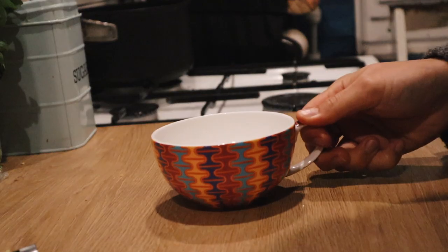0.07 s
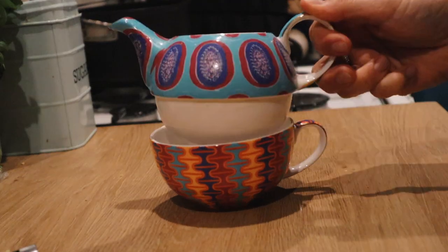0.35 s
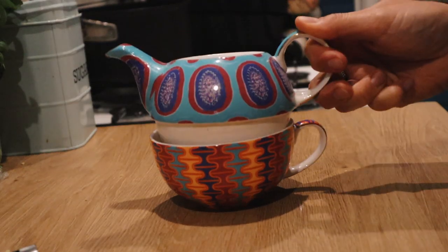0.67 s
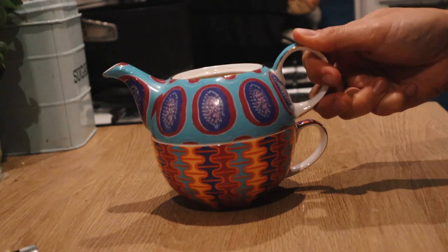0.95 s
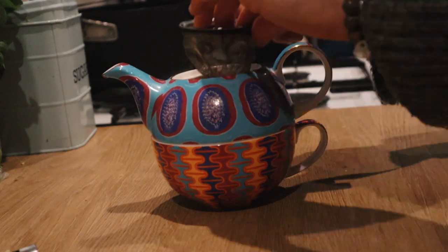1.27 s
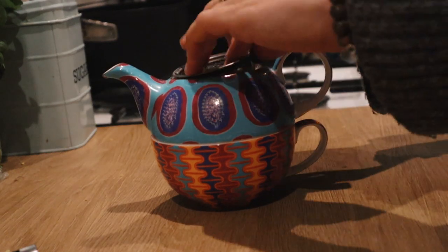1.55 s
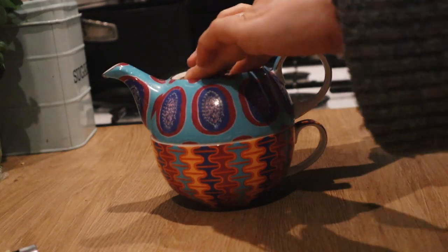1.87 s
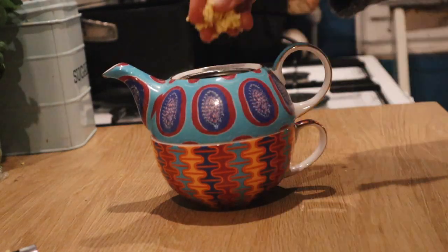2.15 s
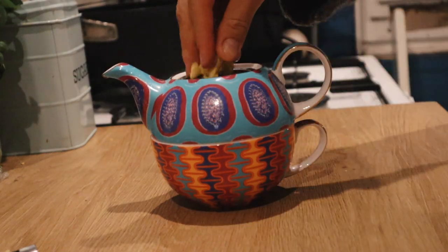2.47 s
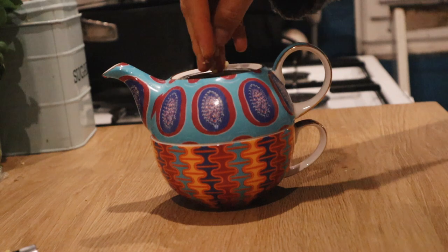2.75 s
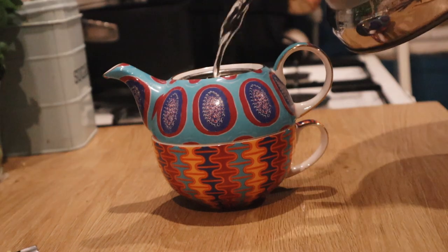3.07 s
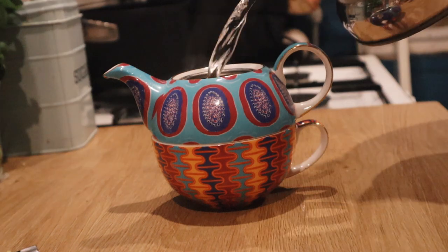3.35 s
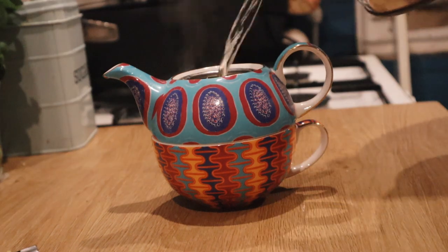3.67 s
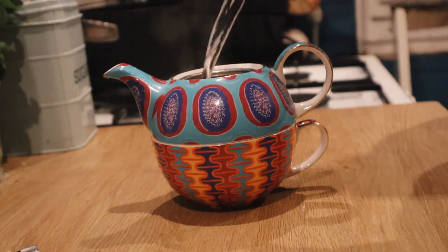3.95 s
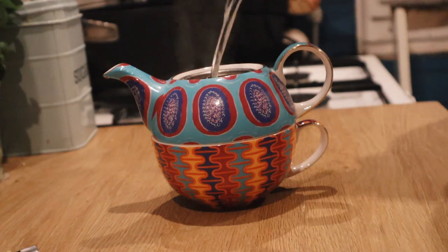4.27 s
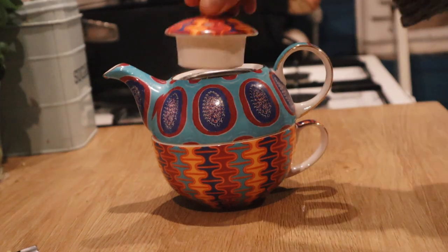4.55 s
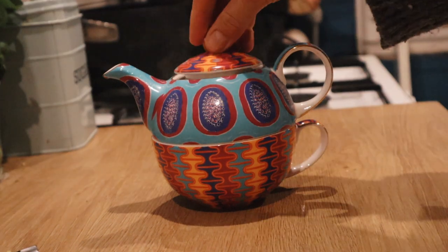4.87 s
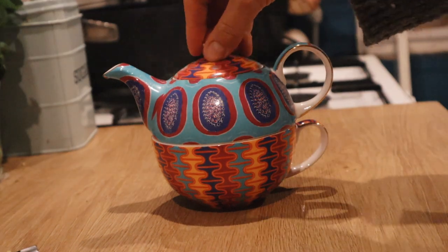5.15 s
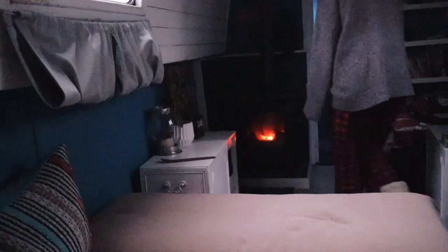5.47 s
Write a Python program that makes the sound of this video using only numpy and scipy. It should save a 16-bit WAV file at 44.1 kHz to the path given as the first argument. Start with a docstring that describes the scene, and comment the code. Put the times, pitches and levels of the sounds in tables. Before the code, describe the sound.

A china teapot rattles into a cup, a steel strainer drops in, water is poured and the lid clinks on, in a small kitchen.

```python
"""A china cup knocks down on a wooden worktop, then a teapot rattles into it: tea for one in a small kitchen.
A steel strainer drops in, a slice rubs in after it, hot water splashes through, the china lid is fitted.
Each hit is a burst of clatter plus ringing modes; the water is spray and bubbles in the pot's hollow.
A bird calls faintly outside; at the end come a soft footfall and a click over the room's hiss."""
import sys
import numpy as np
from scipy import signal
from scipy.fft import rfft, irfft, next_fast_len
from scipy.io import wavfile
from scipy.ndimage import map_coordinates

SR = 44100
rng = np.random.default_rng(int(sys.argv[2]) if len(sys.argv) > 2 else 0)


def wav_record(signal):
    """Record a signal, one row per channel, as 16-bit PCM in the file named by sys.argv[1]."""
    frames = np.transpose(np.atleast_2d(signal))
    bounded = np.clip(frames, -1, 1)
    # unit amplitude maps onto the largest positive 16-bit level
    quanta = np.round(bounded * 32767).astype(np.int16)
    wavfile.write(sys.argv[1], SR, quanta)


N = 251811


def amp(db):
    """Decibels to gain."""
    return 10 ** (np.asarray(db) / 20)


def unit(x):
    """x at rms 1."""
    return x / np.sqrt(np.mean(x ** 2) + 1e-20)


def curve_at(points, hz):
    """Read (f/Hz, value) points on a log frequency axis."""
    f, values = np.transpose(points)
    return np.interp(np.log(hz + 1), np.log(f + 1), values)


def envelope(rows):
    """Gain per sample from (t/s, level/dB) rows, silent outside them."""
    s, db = np.transpose(rows)
    return amp(np.interp(np.arange(N) / SR, s, db, left=-np.inf, right=-np.inf))


def wobble(rate):
    """A smooth random curve, rate knots a second."""
    return map_coordinates(rng.standard_normal(int(N * rate / SR) + 4), [np.arange(N) * rate / SR])


def add(track, s, sound):
    """Mix a sound into the track at time s."""
    start = max(round(s * SR), 0)
    track[start:start + len(sound)] += sound[:N - start]


def filtered(x, response):
    """x through a complex frequency response."""
    size = next_fast_len(N + SR // 2)
    return irfft(rfft(x, size) * response(np.fft.rfftfreq(size, 1 / SR)), size)[:N]


def coloured(x, eq):
    """x through an EQ curve, at rms 1."""
    return unit(filtered(x, lambda hz: amp(curve_at(eq, hz))))


def impulse_response(eq, size=4096):
    """Minimum-phase impulse response of an EQ curve."""
    gains = amp(curve_at(eq, np.fft.rfftfreq(size, 1 / SR)))
    cepstrum = irfft(np.log(gains + 1e-6))
    cepstrum[1:size // 2] *= 2
    cepstrum[size // 2 + 1:] = 0
    return irfft(np.exp(rfft(cepstrum)))[:size // 2]


def stroke(start, length, swell_db, db, release_t60, attack_s=.008):
    """Envelope of one push: a quick attack, a swell as the pressure grows, a release."""
    t = np.arange(N) / SR - start
    attack = np.clip(t / attack_s, 0, 1)
    below_peak_db = swell_db * np.clip(1 - t / length, 0, 1)
    release_db = 60 * np.maximum(t - length, 0) / release_t60
    return attack * amp(db - below_peak_db - release_db)


# Room tone EQ: f/Hz, relative level/dB
HISS_EQ = [(12, -34.5), (20, -3), (134, -4), (301, -10.5), (446, -10.5), (485, -13), (574, -11.5),
           (660, -12.5), (738, -13.5), (1090, -15.5), (2020, -18.5), (5230, -21.5), (16000, -25.5)]
def room_tone():
    """A bed of steady hiss."""
    return amp(-55.5) * coloured(rng.standard_normal(N), HISS_EQ)


# Reverb decay: f/Hz, t60/s
KITCHEN_DECAY = [(150, 0.19), (1000, 0.16), (5000, 0.18), (14000, .16)]
def kitchen_reverb(x):
    """The small room answers with a short noise tail after a 5 ms pre-delay."""
    hz, t, noise = signal.stft(rng.standard_normal(SR // 3), SR, nperseg=256)
    decay = amp(-60 * t / curve_at(KITCHEN_DECAY, hz)[:, None])
    tail = signal.istft(noise * decay, SR, nperseg=256)[1]
    return signal.fftconvolve(np.pad(x, (SR // 200, 0)), tail / np.linalg.norm(tail))[:N]


# Weight rolling onto the foot: t/s, length/s, swell/dB, final level/dB
FOOT_ROLL = [(5.16, 0.16, 9.5, -47.5)]
# Floorboard EQ: f/Hz, relative level/dB
BOARDS_EQ = [(12, -36), (20, -4.5), (119, -1.5), (189, -19), (323, -12.5), (366, -25), (400, -18),
             (520, -27), (880, -120)]
# The heel landing: t/s, f/Hz, level/dB, t60/s
HEEL_THUMP = (5.31, 42, -33, .14)
def footfall():
    """Floorboards thump and rumble under a step."""
    track, t = np.zeros(N), np.arange(SR // 4) / SR
    s, hz, db, t60 = HEEL_THUMP
    add(track, s, amp(db - 60 * t / t60) * np.sin(2 * np.pi * hz * t))
    rumble = stroke(*FOOT_ROLL[0], release_t60=1.75) * coloured(rng.standard_normal(N), BOARDS_EQ)
    return track + rumble


# Bird notes: t/s, length/s, start f/Hz, end f/Hz, dry level/dB
BIRD_NOTES = [(2.906, 0.077, 6420, 4000, -53.5), (3.097, 0.059, 6650, 3640, -50.5),
              (3.295, 0.23, 7340, 6850, -57)]
def bird():
    """Two falling slurs and a thin whistle, washed in reverb for distance."""
    track = np.zeros(N)
    for s, length, from_hz, to_hz, db in BIRD_NOTES:
        progress = np.linspace(0, 1, int(length * SR))
        phase = 2 * np.pi * np.cumsum(from_hz + (to_hz - from_hz) * progress) / SR
        add(track, s, amp(db) * np.sin(np.pi * progress) * np.sin(phase))
    return track + amp(-2.5) * kitchen_reverb(track)


def rub(strokes, eq, release_t60, db):
    """Sliding surfaces catch and slip many times a second; db trims the strokes' levels."""
    slips = rng.standard_normal(N) * amp(2 * wobble(160))
    return amp(db) * sum(stroke(*row, release_t60) for row in strokes) * coloured(slips, eq)


# Slides: t/s, length/s, swell/dB, final level/dB before trim; the strainer adds its scrape level/dB
STRAINER_SLIDES = [(1.353, .05, 3, -44.5, -70.5), (1.443, .155, 7, -38.5, -64.5),
                   (1.70, .04, 22, -28.5, -38.5), (1.838, 0.014, 21, -40.5, -39.5)]
SLICE_SLIDES = [(2.53, 0.13, 13, -47.5)]
LID_SLIDES = [(4.69, .04, 12, -38), (4.755, .026, 6, -30), (4.82, 0.14, 6, -50), (4.99, 0.072, 17, -40.5)]
# Friction EQs: f/Hz, relative level/dB
CHINA_RUB_EQ = [(59, -34), (100, -1), (211, -10), (434, -7.5), (523, -15.5), (617, -1), (895, -23),
                (1380, -32), (2620, -33), (6000, -47), (7370, -31), (8010, -47), (14000, -37.5)]
STEEL_SCRAPE_EQ = [(590, -28.5), (1000, -2.5), (3230, -20), (3540, -17), (7530, -20.5), (8960, -20),
                   (13000, -20.5), (16000, -19.5)]
LID_RUB_EQ = [(47, -43), (80, 7), (187, 0), (272, -0.5), (533, -11), (792, -5.5), (950, -4.5), (1200, -15),
              (1460, -22), (1930, -17), (3850, -33), (4880, -35), (6060, -44), (6690, -28), (9000, -55.5),
              (11700, -87), (19800, -120)]
def rubbing():
    """Strainer, slice and lid slide against the pot's mouth; the steel scrapes as it bites."""
    china = [(s, length, swell_db, db) for s, length, swell_db, db, _ in STRAINER_SLIDES]
    steel = [(s, length, swell_db, db) for s, length, swell_db, _, db in STRAINER_SLIDES]
    return (rub(china, CHINA_RUB_EQ, release_t60=.17, db=3.0)
            + rub(steel, STEEL_SCRAPE_EQ, release_t60=0.21, db=-1.5)
            + rub(SLICE_SLIDES, CHINA_RUB_EQ, release_t60=0.32, db=2.5)
            + rub(LID_SLIDES, LID_RUB_EQ, release_t60=0.033, db=2.0))


# Large bubbles under the basket: t/s, start f/Hz, level/dB
GULPS = [(3.555, 595, -43), (3.735, 624, -46), (3.75, 840, -48), (4.183, 724, -38.5)]
def gulps(t60=0.11, rise_per_s=1.05):
    """Now and then the stream drags down a large bubble, which rings and climbs in pitch."""
    track, t = np.zeros(N), np.arange(SR // 10) / SR
    for s, hz, db in GULPS:
        phase = 2 * np.pi * np.cumsum(hz * (1 + rise_per_s * t)) / SR
        attack = 1 - np.exp(-t / 0.0011)
        add(track, s, amp(db - 60 * t / t60) * attack * np.sin(phase))
    return track


def bubbles(times, db, centre_hz, cycles, rise, spread_db):
    """Damped sines of scattered size whose pitch climbs as they near the surface."""
    pitch_draw, life_draw, level_draw = rng.standard_normal((len(times), 3)).T
    hz = np.clip(centre_hz * np.exp(0.6 * pitch_draw), 500, 14000)[:, None]
    t = np.arange(SR // 40) / SR
    age = t * hz / (cycles * np.exp(0.48 * life_draw))[:, None]  # in decay times
    gains = amp(db + spread_db * np.clip(level_draw, -2, 2))[:, None]
    phase = 2 * np.pi * hz * t * (1 + rise * np.minimum(age, 5))
    grains = gains * (np.exp(-age) - np.exp(-8 * age)) * np.sin(phase)
    index = (times[:, None] * SR).astype(int) + np.arange(len(t))
    return np.bincount(index.ravel(), grains.ravel(), N)[:N]


# Air resonances of the pot: f/Hz, width/Hz, level/dB against the direct sound
POT_AIR = [(652, 56, -3), (1690, 53, 6.5), (2084, 42, 8.5), (3010, 290, 1), (4700, 62, -9)]
def hollow(f):
    """Frequency response of the pot's cavity: the direct sound plus resonant peaks."""
    return 1 + sum(amp(db) * 1j * f * width / (hz * hz - f * f + 1j * f * width)
                   for hz, width, db in POT_AIR)


def small_splashes(flow_rows, count=20, over_flow_db=12.5, scatter_db=4.5):
    """Rows (t/s, level/dB): the stream breaks up unevenly, in lumps that grow with the flow."""
    s, flow_db = np.transpose(flow_rows)
    times = s[0] + (s[-1] - s[0]) * (np.arange(count) + rng.uniform(size=count)) / count
    levels_db = np.interp(times, s, flow_db) + over_flow_db + scatter_db * rng.standard_normal(count)
    return np.column_stack([times, levels_db])


# The stream gushes, thins, then runs full: t/s, relative level/dB
FLOW = [(3.49, -72), (3.609, -44), (3.8, -56.5), (4.11, -46.5), (4.26, -50), (4.52, -44.5), (4.59, -74.5)]
# Splash accents: t/s, relative level/dB
BIG_SPLASHES = [(3.6237, -32), (3.6448, -34.5), (3.7259, -35.5), (3.8287, -36), (3.8462, -34),
                (4.0074, -38), (4.0467, -33.5), (4.0823, -47), (4.138, -31.5), (4.1794, -38), (4.2117, -31),
                (4.3122, -30), (4.4219, -33)]
# Spray EQ: f/Hz, relative level/dB
SPRAY_EQ = [(180, -1), (300, -2), (537, -4.5), (667, 1), (1060, -16.5), (1300, -6), (1900, -51),
            (2100, -17), (2360, -10), (3030, -2.5), (4160, -10.5), (7950, -8.5), (16000, -23.5)]
def pour(bubbles_per_splash=24, puff_t60=0.032):
    """The stream fizzes in the basket; each splash is a puff of spray and a cluster of bubbles."""
    flow = envelope(FLOW)
    splashes = np.vstack([BIG_SPLASHES, small_splashes(FLOW)])
    spray = unit(rng.standard_normal(N) * amp(3 * wobble(300))) * flow * amp(-6)
    t = np.arange(SR // 20) / SR
    for s, db in splashes:
        add(spray, s + 0.0015, amp(db - 7.0 - 60 * t / puff_t60) * rng.standard_normal(len(t)))
    spray_in_pot = coloured(filtered(spray, hollow), SPRAY_EQ) * np.std(spray)
    starts, levels_db = np.repeat(splashes, bubbles_per_splash, axis=0).T
    delays = 0.0017 + rng.exponential(0.0036, len(starts))
    clusters = bubbles(starts + delays, levels_db - 14, centre_hz=4800, cycles=6, rise=.003, spread_db=3)
    fizz = bubbles(rng.uniform(0, N / SR, 4500), 0, centre_hz=4400, cycles=9, rise=.004, spread_db=5)
    return spray_in_pot + filtered(clusters, hollow) + amp(-6) * flow * unit(filtered(fizz, hollow))


# The knock, clack and tick bands of a hit: low f/Hz, high f/Hz
HIT_BANDS = [(90, 600), (600, 3000), (3000, 16000)]
def clatter(body, band_db, t60, hard_hz, push):
    """One contact: a smooth push and a dense, fast-dying rattle, levelled in each band."""
    t = np.arange(SR // 5) / SR
    rattle = rng.standard_normal(len(t)) * amp(-60 * t / t60) * (1 - np.exp(-t / 0.00015))
    pulse = np.exp(-t / .0001)
    lowpass = signal.butter(2, np.clip(hard_hz, 500, 20000), fs=SR, output="sos")
    force = signal.sosfilt(lowpass, rattle + push * pulse / pulse.sum())
    sound = signal.fftconvolve(force, body)[:len(t)]
    hit = np.zeros(len(t))
    for band, db in zip(HIT_BANDS, band_db):
        part = signal.sosfilt(signal.butter(2, band, "band", fs=SR, output="sos"), sound)
        hit += amp(db) * part / np.std(part[:SR // 100])  # the first 10 ms set the level
    return hit


def knocks(contacts, eq, push, db):
    """The unpitched layer: each contact clatters through the object's body."""
    track, body = np.zeros(N), impulse_response(eq)
    for s, knock_db, clack_db, tick_db, *_, t60, hard_hz in contacts:
        add(track, s, clatter(body, (knock_db, clack_db, tick_db), t60, hard_hz, push))
    return amp(db) * track


def rolloff(hz, hard_hz):
    """A contact of finite length has little force above its hardness."""
    return 1 / (1 + (hz / hard_hz) ** 8)


def rings(contacts, modes, db, soft_hz=np.inf, stops_s=(), stop_t60=0.045):
    """The pitched layer: contacts ring the modes; soft ones miss the highs; stops cut the ring short."""
    track, t = np.zeros(N), np.arange(SR // 2) / SR
    hz, mode_db, t60 = np.transpose(modes)
    waves = np.sin(2 * np.pi * hz[:, None] * t) * amp(-60 * t / t60[:, None])
    centres = np.sqrt(np.prod(HIT_BANDS, axis=1))
    for s, *band_db, ring_db, _, hard_hz in contacts:
        drive_db = np.interp(np.log(hz), np.log(centres), band_db) + ring_db + rng.normal(0, 1, len(hz))
        gains = amp(drive_db + mode_db) * rolloff(hz, hard_hz) * rolloff(hz, soft_hz)
        # Free until the next stop; after the last stop, damped at once.
        free_s = min([stop - s for stop in stops_s if stop > s], default=0 if stops_s else np.inf)
        damping = amp(-60 * np.maximum(t - free_s, 0) / stop_t60)
        add(track, s, gains @ waves * damping)
    return amp(db) * track


def voice_hits(rows, mid_db, hard_hz, mid_share=.25, db_per_octave=13):
    """Brightness (tick over knock) sets band levels and cutoff: more treble, reaching higher."""
    return [(s, db, db + mid_db + mid_share * bright_db, db + bright_db,
             ring_db, t60, hard_hz * 2 ** (bright_db / db_per_octave))
            for s, db, bright_db, ring_db, t60 in rows]


# Dull hits: t/s, knock/dB, clack/dB, tick/dB (all before trim), clatter t60/s, hardness/Hz
TAP_HITS = [(2.1375, -29.5, -44.5, -71, 0.012, 1290), (5.345, -36, -30.5, -32, 0.14, 8100)]
# Tap EQ: f/Hz, relative level/dB
TAP_EQ = [(60, 5), (300, 10), (1000, 13), (4000, 10.5), (15000, -15)]
def taps():
    """A fingertip tap and a small far click, neither with a ring."""
    return knocks(TAP_HITS, TAP_EQ, push=1.7, db=-6.5)


# The cup rocks on the wood: t/s, relative knock/dB, brightness/dB, ring/dB, clatter t60/s
CUP_HITS = [(0.001, -28, -8.5, 8, 0.053), (0.0101, -18, -6.5, -16.5, 0.057),
            (0.0285, -21, -11.5, -16.5, 0.081), (0.0431, -19.5, -15, 2, 0.15),
            (0.3255, -22.5, -23, -34.5, 0.045)]
# Cup ring: f/Hz, relative level/dB, t60/s
CUP_MODES = [(1001, -17, .68), (2233, -9.5, .65), (2466, -3.5, .68), (4054, -20, .45), (4860, -14.5, .2),
             (5920, -19, .2)]
# Cup clatter EQ: f/Hz, relative level/dB
CUP_EQ = [(47, -19), (80, -11), (281, -8), (419, 4.5), (599, 2), (1050, -7), (1980, -10.5), (2200, -10),
          (2820, 0.5), (3140, -19), (4770, -25.5), (5300, -33), (7260, -27.5), (11300, -30), (12000, -80),
          (15600, -102), (22000, -120)]
# The cup's ring cuts off abruptly, and later dies as the pot seats: t/s
CUP_RING_STOPS = [0.33, .885]
def cup():
    """The cup's foot meets soft wood, which wakes mainly its lowest note."""
    hits = voice_hits(CUP_HITS, mid_db=2, hard_hz=3665)
    knock = knocks(hits, CUP_EQ, push=15.0, db=5.5)
    return knock + rings(hits, CUP_MODES, db=10.5, soft_hz=1327, stops_s=CUP_RING_STOPS)


# The skirt bumps the rim, then the flange lands and rocks:
# t/s, relative knock/dB, brightness/dB, ring/dB, clatter t60/s
LID_BUMPS = [(4.6724, -14.5, -11, 5.5, 0.057), (4.7893, -29, 2, 1, 0.048), (4.797, -27.5, -43, -16, 0.047),
             (4.8811, -34.5, 0.5, -6, 0.074), (4.9535, -34.5, -35.5, -18, 0.072)]
LID_LANDING = [(5.0671, -27.5, 7, -6.5, 0.034), (5.09, -35.5, 2, -10, 0.054),
               (5.148, -57.5, 5.5, -21, 0.044)]
# Lid ring: f/Hz, relative level/dB, t60/s
LID_MODES = [(952, -5, .05), (1540, -21, .15), (1910, -21, .1), (3315, -22, .22), (3597, -16, .053),
             (4750, -8.5, .048), (5150, -9, .06), (6621, -4.5, .2), (7903, -6, .07)]
# Lid clatter EQ: f/Hz, relative level/dB
LID_EQ = [(47, -31.5), (80, -15.5), (248, -3), (700, -4), (960, -6.5), (1310, -17.5), (1490, -14),
          (2220, -13.5), (3320, -5.5), (4230, -22), (4830, -9.5), (6030, -24.5), (6740, -20), (9610, -27),
          (16000, -26)]
def lid():
    """The lid, held by its knob, ticks on the rim, then lands flat with a hollow clack."""
    hits = voice_hits(LID_BUMPS, mid_db=1.0, hard_hz=9900)
    hits += voice_hits(LID_LANDING, mid_db=8, hard_hz=2877)
    return knocks(hits, LID_EQ, push=7, db=1.5) + rings(hits, LID_MODES, db=3.0)


# A light ting, then the pot touches the cup's rim and rattles home:
# t/s, relative knock/dB, brightness/dB, ring/dB, clatter t60/s
POT_HITS = [(0.267, -54.5, -2.5, 4.5, .05), (0.6722, -22.5, 0.5, 1, 0.093), (0.7005, -27, -17, 1.5, 0.02),
            (0.8077, -17, 2, -1, .1), (0.8205, -24.5, 10.5, -2, 0.12), (0.8275, -13, 1, -2, .06),
            (0.8537, -10.5, 4, -4, .075), (0.874, -23, 9.5, 7, .055), (0.883, -24, 5.5, -6.5, 0.12),
            (0.9025, -29.5, -6.5, -16, 0.11), (0.966, -39.5, -3.5, -3, 0.094), (1.044, -50, -33, -22, .04),
            (1.1715, -54, -10, -17.5, 0.039)]
# Pot ring: f/Hz, relative level/dB, t60/s
POT_MODES = [(770, 4, .061), (2486, -7, .09), (2940, -8, .072), (3315, -8, .1), (4013, -16, .14),
             (4845, -12, .17), (5076, -11, .08), (5636, -8.5, .38), (6939, -3.5, .1), (7165, -7, .1),
             (7247, -6, .1), (7960, -12.5, .1), (9300, -9, .1), (10840, -21.5, .24), (11775, -29, .28),
             (13580, -19.5, .18)]
# Pot clatter EQ: f/Hz, relative level/dB
POT_EQ = [(47, -45), (80, -28), (212, -9), (265, -14), (378, -6.5), (493, -1), (751, -4), (1600, -16),
          (2430, -16.5), (3700, -2), (6170, -13.5), (7050, -3), (8410, -26.5), (9190, -27.5), (16000, -20)]
# The hand steadies the pot: t/s
POT_RING_STOPS = [1]
def teapot():
    """China on china: pot and cup both ring."""
    hits = voice_hits(POT_HITS, mid_db=3.5, hard_hz=11000)
    pot_ring = rings(hits, POT_MODES, db=-1.5, stops_s=POT_RING_STOPS)
    cup_ring = rings(hits, CUP_MODES, db=-3, stops_s=CUP_RING_STOPS)
    return pot_ring + cup_ring + knocks(hits, POT_EQ, push=4, db=1.5)


# Steel on china: t/s, relative knock/dB, brightness/dB, ring/dB, clatter t60/s
STRAINER_HITS = [(1.541, -34, -36, -9.5, 0.034), (1.6017, -4, -28.5, -9.5, .09),
                 (1.613, -26.5, -19, -3.5, 0.055), (1.626, -22.5, -39, -14, .06),
                 (1.744, -30, -19.5, -1, 0.049), (1.752, -19.5, -52, -10.5, 0.03),
                 (1.7721, -19, -2, 3.5, 0.045), (1.8537, -6, -5, -12, 0.056)]
# Strainer ring: f/Hz, relative level/dB, t60/s
STRAINER_MODES = [(576.4, -0.5, 0.051), (2039, -15, 0.098), (3750, -25.5, 0.069), (5130, -6, 0.096),
                  (5063, -13.5, 0.08), (6498, -21.5, .11), (7500, 3, 0.054), (9680, -29.5, 0.045),
                  (10770, -16, .06), (12700, -6.5, .07), (14770, -8, .09)]
# Strainer clatter EQ: f/Hz, relative level/dB
STRAINER_EQ = [(47, -45.5), (80, -26), (215, -7.5), (300, -8), (460, 1), (896, -16.5), (1280, -25.5),
               (1400, -24.5), (2490, -17.5), (2840, -27), (3700, -29), (4140, -33.5), (5050, -27.5),
               (7870, -29), (9820, -29.5), (16000, -27.5)]
def strainer():
    """The steel basket bumps the pot's mouth and snaps into its seat."""
    hits = voice_hits(STRAINER_HITS, mid_db=0.5, hard_hz=17500)
    return knocks(hits, STRAINER_EQ, push=37.7, db=0.5) + rings(hits, STRAINER_MODES, db=2.5)


def scene():
    """The mono mix: sounds at the pot get a light reverb send; cup and taps stay dry."""
    at_pot = teapot() + strainer() + lid() + rubbing() + pour() + gulps()
    direct = at_pot + cup() + taps()
    return (direct + amp(-15.5) * kitchen_reverb(at_pot) + bird() + room_tone() + footfall())[None]


def record(dry, top_hz=16100):
    """The hardest clinks soft-clip at full scale; everything above top_hz is cut."""
    clipped = dry[0] / (1 + np.abs(dry[0]) ** 8) ** (1 / 8)
    return filtered(clipped, lambda hz: hz < top_hz)[None]


dry = scene()
out = record(dry)
wav_record(out)
```